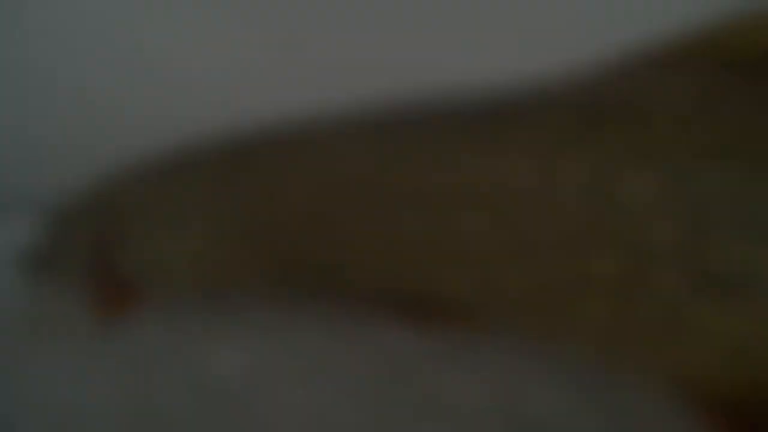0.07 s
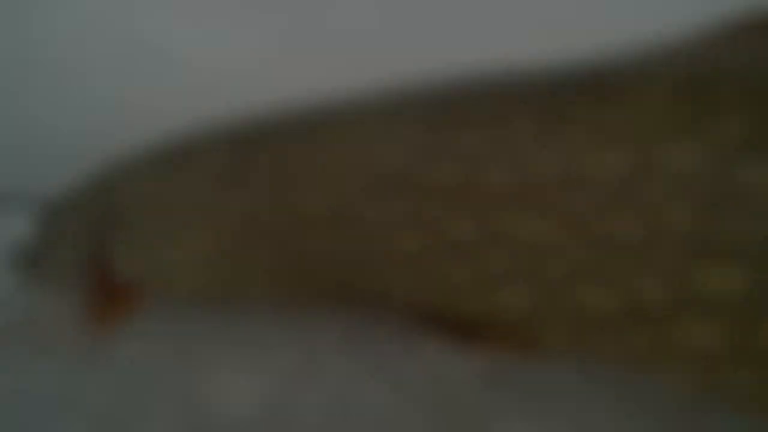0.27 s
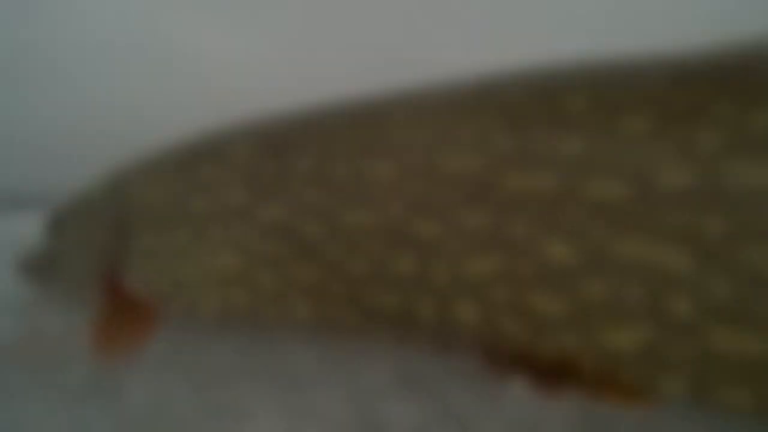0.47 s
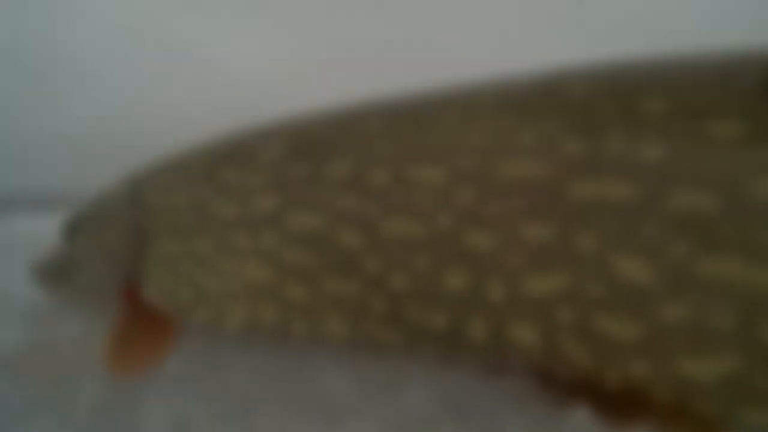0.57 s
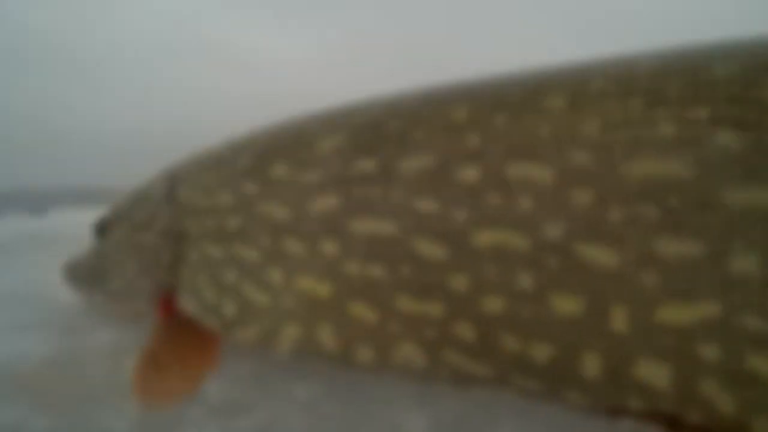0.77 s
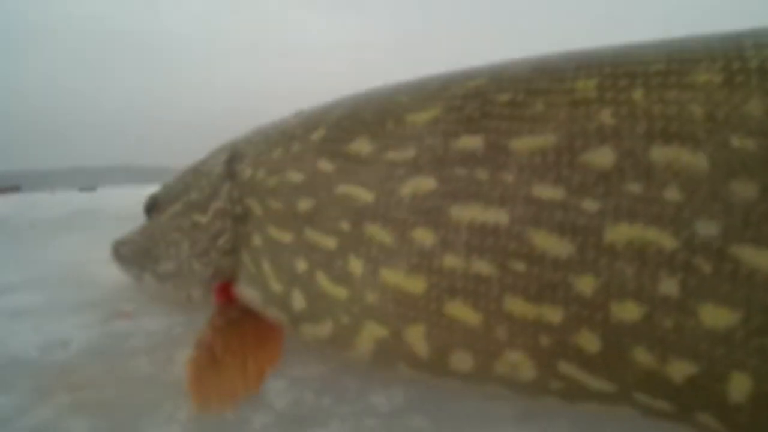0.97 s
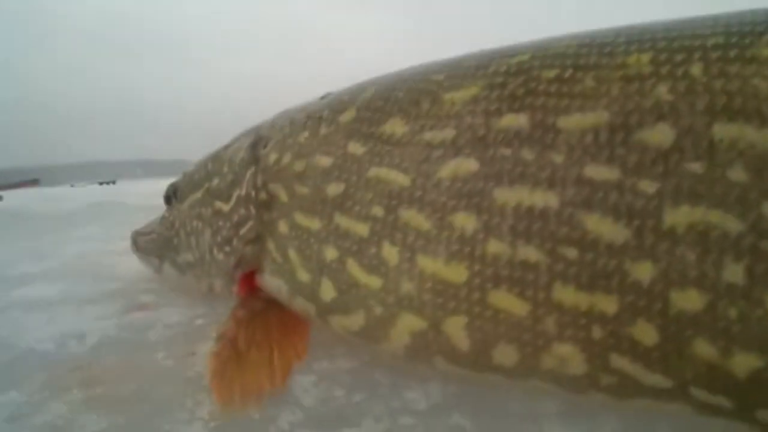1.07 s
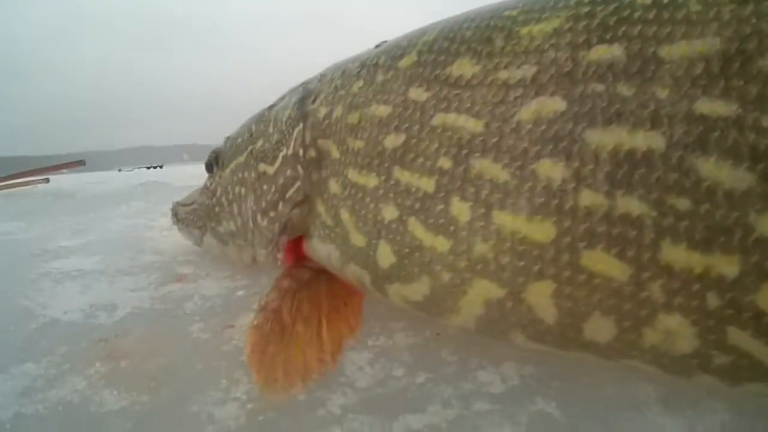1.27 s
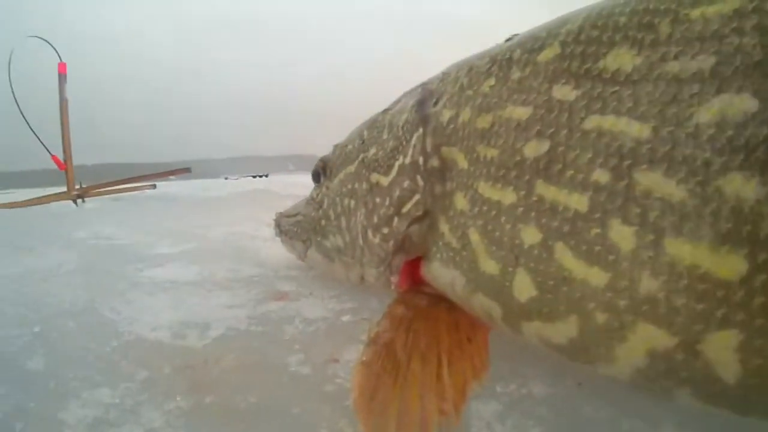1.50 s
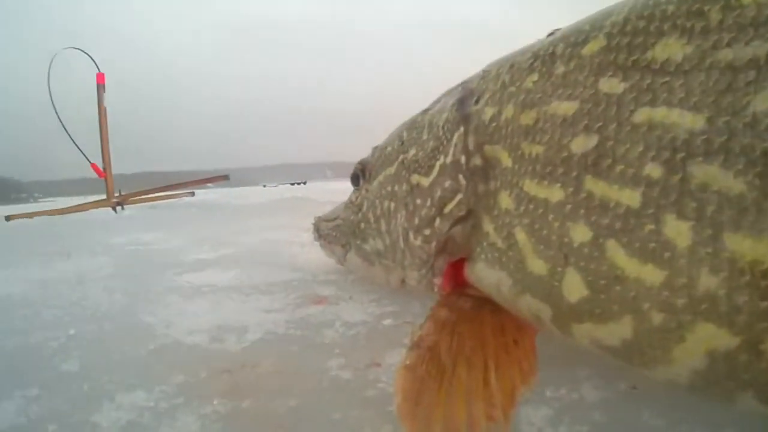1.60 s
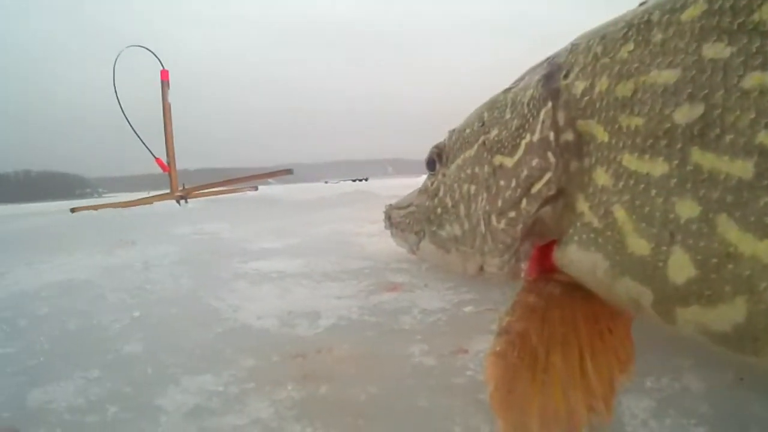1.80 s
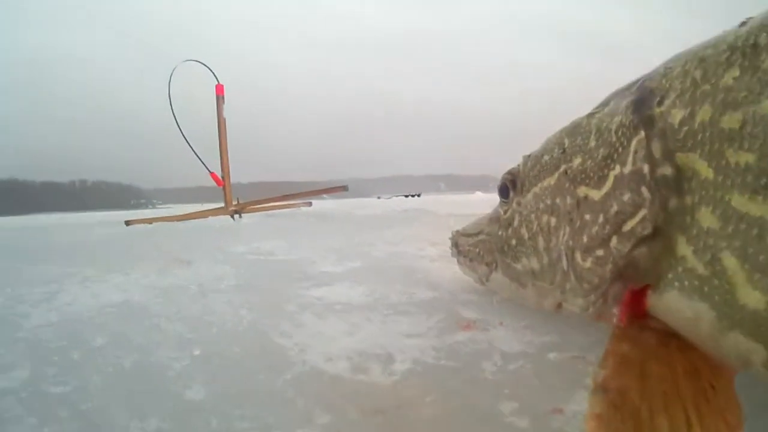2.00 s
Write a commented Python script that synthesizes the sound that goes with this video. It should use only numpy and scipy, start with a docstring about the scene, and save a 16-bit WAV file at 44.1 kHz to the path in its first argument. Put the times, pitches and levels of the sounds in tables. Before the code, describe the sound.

A low wind rumble swells on the microphone, dotted with crisp clicks and hollow taps.

```python
"""Wind buffets a microphone, swelling to a gust whose sharp eddies flutter and just overload it.
The small camera that holds it is moved by hand along a fish lying on a frozen lake.
Crisp ticks of handling or ice grit and two hollow taps sound through the housing,
over faint rubbing, rustle and hiss."""
import sys
import numpy as np
from scipy import signal
from scipy.fft import rfft, irfft
from scipy.io import wavfile
from scipy.ndimage import uniform_filter1d

SR = 44100
rng = np.random.default_rng(int(sys.argv[2]) if len(sys.argv) > 2 else 0)


def transcribe(u):
    """Save the signal u as a 16-bit wav file named by the first command-line argument.

    u: samples, shape (n,) or (channels, n), limited to [-1, 1]; the rate is SR.
    q: integer samples, one column per channel.
    """
    v = np.clip(np.atleast_2d(u).T, -1, 1)
    q = np.round(v * 32767).astype(np.int16)
    wavfile.write(sys.argv[1], SR, q)


N = 90404


def amp(db):
    """Decibels to gain."""
    return 10 ** (np.asarray(db) / 20)


def unit_rms(x):
    """Scale to an rms of one."""
    return x / np.sqrt(np.mean(x ** 2) + 1e-20)


def curve_at(points, hz):
    """Interpolate (Hz, value) rows on a log-frequency axis."""
    f, value = np.transpose(points)
    return np.interp(np.log(hz + 1), np.log(f + 1), value)


def envelope(points):
    """Gain over time from (s, dB) rows."""
    s, db = np.transpose(points)
    return amp(np.interp(np.arange(N) / SR, s, db))


def add(mix, start_s, sound):
    """Mix a sound in, cropped at both ends of the mix."""
    at = round(start_s * SR)
    part = mix[max(at, 0):max(at + len(sound), 0)]
    part += sound[max(-at, 0):][:len(part)]


def noise(spectrum):
    """Unit-rms noise shaped by (Hz, dB) rows."""
    gain = amp(curve_at(spectrum, np.fft.rfftfreq(N, 1 / SR)))
    return unit_rms(irfft(rfft(rng.standard_normal(N)) * gain, N))


def grainy_noise(spectrum, grain_db):
    """Unit-rms noise whose level jitters every few milliseconds."""
    grain = unit_rms(uniform_filter1d(rng.standard_normal(N), size=130))
    return unit_rms(noise(spectrum) * amp(grain_db * grain))


def steadied(x, window_samples):
    """Divide by the running rms to remove slow swells."""
    return x / np.sqrt(uniform_filter1d(x ** 2, window_samples) + 1e-9)


def minimum_phase(db):
    """Shortest impulse response with this gain curve."""
    log_gain = np.log(amp(np.r_[db, db[-2:0:-1]]))
    return np.fft.ifft(np.exp(np.conj(signal.hilbert(log_gain)))).real


# hiss envelope (time [s], level [dB])
HISS_LEVEL = [(0, -55.5), (.3, -51), (.6, -49.5), (1.2, -47.5), (2.05, -45.5)]
# hiss spectrum (frequency [Hz], relative density [dB])
HISS_SPECTRUM = [(100, 4.5), (1000, 4), (2500, -1.5), (5000, 6), (8000, 3.5), (12000, 4), (15500, 3)]
# left-right likeness (frequency [Hz], correlation [ratio])
HISS_CORRELATION = [(100, 0.64), (2000, 1), (5000, 0.9), (8000, 0.37), (15000, 0.32)]


def hiss(left_db=-2.2):
    """Background hiss, wider in the treble, slowly rising."""
    correlation = curve_at(HISS_CORRELATION, np.fft.rfftfreq(N, 1 / SR))
    left, independent = noise(HISS_SPECTRUM), noise(HISS_SPECTRUM)
    right = irfft(correlation * rfft(left) + np.sqrt(1 - correlation ** 2) * rfft(independent), N)
    return np.array([amp(left_db) * left, right]) * envelope(HISS_LEVEL)


# rustle envelope (time [s], level [dB])
RUSTLE_LEVEL = [(0, -56.5), (.35, -49.5), (.52, -48.5), (.59, -43.5), (.72, -45), (.82, -43), (1.15, -44.5),
                (1.27, -40), (1.45, -41), (1.6, -41), (1.82, -46), (2.05, -40.5)]
# rustle spectrum (frequency [Hz], relative density [dB])
RUSTLE_SPECTRUM = [(300, -0.5), (700, 0), (1250, 1.5), (1700, -3.5), (2300, -3), (2850, -3), (3500, -6),
                   (4500, -8.5), (6500, -14), (12000, -24)]


def rustle():
    """Faint, fine-grained rustle of the moving camera."""
    return grainy_noise(RUSTLE_SPECTRUM, grain_db=2.0) * envelope(RUSTLE_LEVEL)


# hand slides (centre time [s], half length [s], level [dB])
RUB_STROKES = [(0.588, 0.022, -42.5), (0.81, 0.018, -41), (0.97, 0.059, -45), (1.163, 0.033, -45.5),
               (1.307, 0.074, -44.5), (1.435, 0.054, -44.5)]
# friction through the housing (frequency [Hz], relative density [dB])
RUB_SPECTRUM = [(300, -34), (900, -13), (1250, -0.5), (1700, -23), (2300, -5.5), (2800, 2.5), (3150, -14.5),
                (3600, -17), (8000, -23)]


def rubs():
    """Short hand slides swell and fade as grainy friction in the housing's resonances."""
    t = np.arange(N) / SR
    strokes = sum(amp(db) * np.exp(-((t - centre_s) / half_s) ** 2)
                  for centre_s, half_s, db in RUB_STROKES)
    return strokes * grainy_noise(RUB_SPECTRUM, grain_db=5.0)


# firm contacts (time [s], level [dB], pitch [ratio])
TAPS = [(1.2459, -16.5, 1.03), (1.4174, -13, 0.982)]
# hollow modes (frequency [Hz], relative level [dB], T60 [s])
TAP_MODES = [(1000, -7.5, .03), (1150, -5.5, .02), (1334, -4.5, 0.035), (1580, -7.5, 0.019),
             (2670, -9, 0.015)]


def taps(attack_s=0.00023):
    """Firm contacts ring a few short hollow modes."""
    out, t = np.zeros(N), np.arange(SR // 10) / SR
    attack = 1 - np.exp(-t / attack_s)
    for start_s, db, pitch in TAPS:
        for hz, mode_db, t60_s in TAP_MODES:
            decay = amp(db + mode_db - 60 * t / t60_s)
            tone = np.sin(2 * np.pi * (hz * pitch * t + rng.random()))
            add(out, start_s, attack * decay * tone)
    return out


# handling or grit ticks (time [s], relative level [dB], emphasis [Hz])
TICKS = [(.0215, -27.5, 3780), (0.0615, -32.5, 3470), (.173, -31, 3470), (0.1765, -27.5, 3480),
         (0.1947, -18, 2140), (0.245, -25.5, 2530), (0.2484, -12.5, 4600), (0.4172, -32, 3970),
         (0.4517, -24, 3900), (0.463, -27, 3400), (0.4707, -23, 3870), (0.4754, -17.5, 5100),
         (0.4945, -6.5, 3320), (.527, -28, 4500), (0.5889, -19.5, 4230), (0.5937, -28, 4000),
         (.6163, -26, 4000), (0.634, -20, 4000), (0.667, -23, 3500), (0.671, -23, 5500), (0.681, -22, 4960),
         (0.6877, -17.5, 2220), (0.722, -20.5, 3740), (0.7458, -11.5, 3600), (.776, -16, 2250),
         (0.8068, -26, 2980), (0.8205, -20, 7400), (1.238, -26, 3500), (1.2444, -12.5, 3220),
         (1.3189, -15, 3950), (1.3931, -12.5, 2820), (1.417, -15.5, 2330), (1.4282, -30.5, 3000),
         (1.4423, -23.5, 5030), (1.5143, -20, 3070), (1.6373, -25, 4600), (1.7051, -24.5, 3530),
         (1.7224, -24, 3040), (1.7572, -21, 3450), (1.8942, -19, 3980), (1.918, -28, 3500),
         (2.0354, -23, 3660)]
# housing response (frequency [Hz], gain [dB])
HOUSING_RESPONSE = [(300, -32), (1000, -11), (1900, 2), (2700, 0), (3400, -3.5), (4400, 2), (5400, -7),
                    (6500, -11.5), (7600, -8.5), (9000, -20), (15000, -23)]


def ticks(gain_db=9.5, width_oct=1.0, rebound_s=0.00055, rattle_db=-22.5, rattle_t60_s=0.016):
    """A snap, an instant rebound and a short rattle, coloured by the housing."""
    out, size = np.zeros(N), 2048
    t, hz = np.arange(size) / SR, np.fft.rfftfreq(size, 1 / SR)
    for start_s, db, emphasis_hz in TICKS:
        offset_oct = np.log2((hz + 1) / emphasis_hz)
        rolloff_db = 10 * np.log10(1 + (2 * offset_oct / width_oct) ** 2)
        response = minimum_phase(curve_at(HOUSING_RESPONSE, hz) - rolloff_db)
        force = amp(rattle_db - 60 * t / rattle_t60_s) * rng.standard_normal(size)
        force[0] += 1  # snap
        force[round(rebound_s * SR * rng.uniform(.85, 1.15))] += 0.18
        tick = signal.fftconvolve(force, response)[:size]
        add(out, start_s, amp(db + gain_db) * tick / np.linalg.norm(tick))
    return out


# wind strength at the microphone (time [s], relative level [dB])
GUST_LEVEL = [(0, -30.5), (.13, -32.5), (.2, -23), (.27, -24.5), (.33, -27), (.46, -23), (.56, -14.5),
              (.69, -13.5), (.9, -9), (1, -12.5), (1.17, -18), (1.24, -24), (1.3, -16.5), (1.38, -22.5),
              (1.6, -14), (1.72, -26.5), (1.9, -27.5), (1.97, -27), (2.05, -32.5)]
# turbulence spectrum (frequency [Hz], relative density [dB])
RUMBLE_SPECTRUM = [(8, 3), (25, 1), (45, 1), (80, -1), (125, -7), (180, -19), (300, -35), (600, -57),
                   (2000, -100)]


def wind_rumble(gain_db=1, deep_hz=69.5, strong_gust_db=-16.5, brighten_db_per_db=0.62):
    """Deep turbulence at the microphone, brighter as the gust grows."""
    hz, gust = np.fft.rfftfreq(N, 1 / SR), envelope(GUST_LEVEL)
    turbulence = noise(RUMBLE_SPECTRUM)
    deep = irfft(rfft(turbulence) / (1 + (hz / deep_hz) ** 4), N)
    brightness = (gust / amp(strong_gust_db)) ** brighten_db_per_db
    rumble = deep + brightness * (turbulence - deep)
    return amp(gain_db) * steadied(rumble, window_samples=2400) * gust


# flutter envelope (time [s], relative level [dB])
FLUTTER_LEVEL = [(0, -34.5), (.15, -42.5), (.2, -29.5), (.265, -30), (.31, -43.5), (.44, -40.5),
                 (.54, -20.5), (.69, -17), (.76, -26), (.82, -14), (.95, -14.5), (1.09, -19.5), (1.18, -28),
                 (1.24, -37), (1.31, -31), (1.38, -38.5), (1.45, -27.5), (1.65, -22.5), (1.73, -43.5),
                 (1.8, -33.5), (1.88, -46.5), (2.05, -44)]
# flutter spectrum (frequency [Hz], relative density [dB])
FLUTTER_SPECTRUM = [(40, -27), (110, -2), (170, 4), (270, -6), (400, -15), (600, -28.5), (1000, -38.5),
                    (2000, -58)]


def wind_flutter(gain_db=-1.5, lump_depth_db=6, lump_cutoff_hz=41.7):
    """Wind flutters in the low mids, in quick random lumps."""
    lowpass = np.exp(-(np.fft.rfftfreq(N, 1 / SR) / lump_cutoff_hz) ** 2)
    lumps = unit_rms(irfft(rfft(rng.standard_normal(N)) * lowpass, N))
    flutter = noise(FLUTTER_SPECTRUM) * amp(lump_depth_db * lumps)
    return amp(gain_db) * steadied(flutter, window_samples=1800) * envelope(FLUTTER_LEVEL)


# eddies arriving at the microphone port (time [s], envelope peak [dB], centre frequency [Hz])
EDDIES = [(.003, -23, 245), (.196, -13, 166), (.256, -15, 165), (0.5667, -2, 352), (0.575, -13.5, 260),
          (.669, -2, 142), (.671, -23, 695), (0.686, -6.5, 184), (0.707, -6, 266), (0.722, -2, 95),
          (.816, -8.5, 270), (.826, -11, 298), (0.86, -10.5, 490), (0.889, -6, 310), (0.902, -20, 89),
          (.910, -13, 352), (0.917, -10.5, 375), (0.928, -2, 315), (0.945, -14, 290), (0.958, -5.5, 232),
          (0.9743, -10, 690), (.985, -15, 715), (1.003, -9, 437), (1.008, -14, 805), (1.015, -10, 315),
          (1.032, -3, 172), (1.052, -16, 450), (1.071, -14, 320), (1.077, -3.5, 130), (1.0837, -10.5, 704),
          (1.086, -10, 464), (1.098, -19, 590), (1.148, -20.5, 493), (1.152, -11, 226), (1.163, -16.5, 300),
          (1.172, -10.5, 110), (1.201, -20, 222), (1.238, -22, 517), (1.529, -11, 320), (1.539, -17.5, 352),
          (1.6, -16, 358), (1.609, -8.5, 153), (1.6293, -16.5, 550), (1.641, -14.5, 586),
          (1.645, -9.5, 315), (1.684, -21.5, 317), (1.780, -22, 384)]


def wind_eddies(band_narrowness=6.16, port_hz=1370):
    """Each eddy is one smooth pressure swing; the smaller it is, the higher it sounds."""
    pressure, t = np.zeros(N), np.arange(-2048, 2048) / SR
    for centre_s, db, hz in EDDIES:
        phase = np.exp(2j * np.pi * rng.random())
        swing = phase / (1 - 2j * np.pi * hz * t / band_narrowness) ** (band_narrowness + 1)
        add(pressure, centre_s + t[0], amp(db) * swing.real)
    # eddies much smaller than the port average out
    port_lowpass = 1 / (1 + (np.fft.rfftfreq(2 * N, 1 / SR) / port_hz) ** 6)
    return irfft(rfft(pressure, 2 * N) * port_lowpass)[:N]


def scene(overload_limit=0.92, wind_pan=0.0021, contact_pan=-0.013):
    """Wind and contacts reach both channels almost alike; the strongest buffets clip softly."""
    buffets = wind_rumble() + wind_flutter() + wind_eddies()
    clipped = buffets / (1 + (buffets / overload_limit) ** 6) ** (1 / 6)
    contacts = rustle() + rubs() + taps() + ticks()
    side = np.array([[1], [-1]])  # left, right
    return hiss() + contacts * (1 + contact_pan * side) + clipped * (1 + wind_pan * side)


def record(dry, cutoff_hz=15600):
    """The camera's band limit."""
    lowpass = signal.firwin(511, cutoff_hz, window=("kaiser", 9), fs=SR)
    return signal.oaconvolve(dry, lowpass[None], "same")


dry = scene()
out = record(dry)
transcribe(out)
```